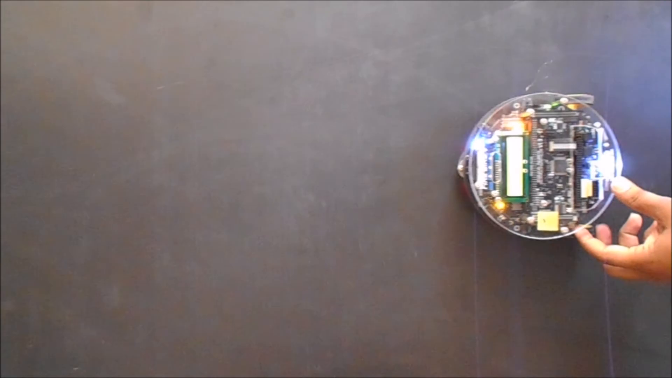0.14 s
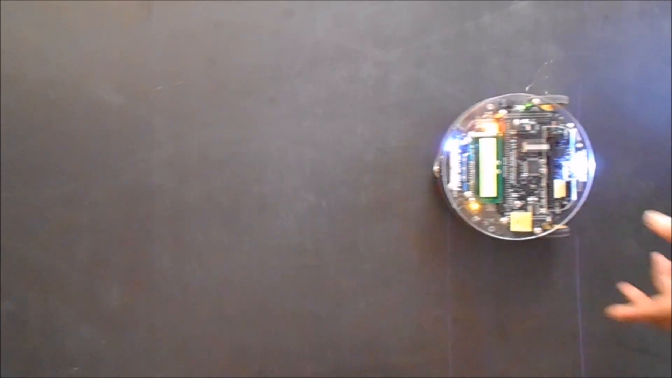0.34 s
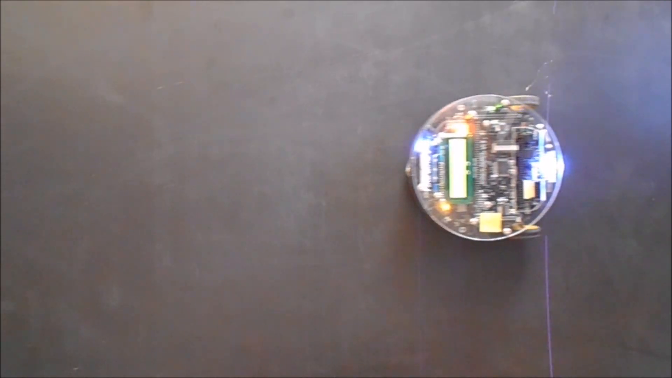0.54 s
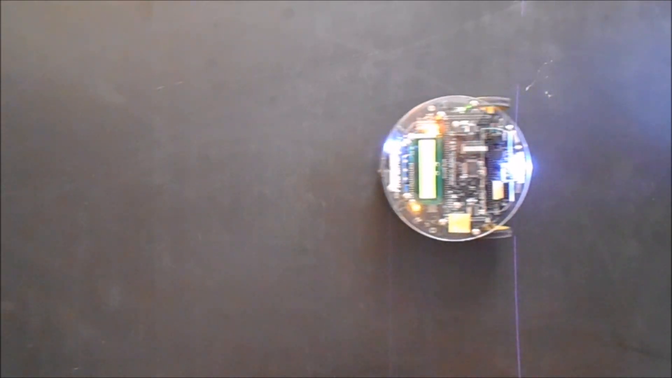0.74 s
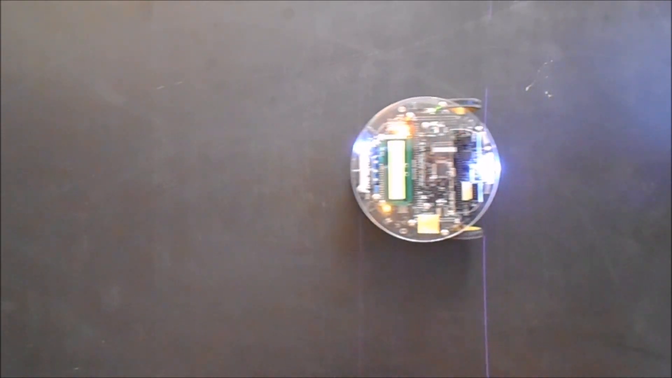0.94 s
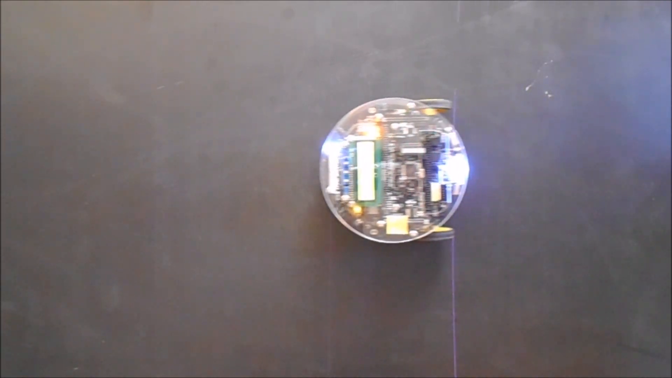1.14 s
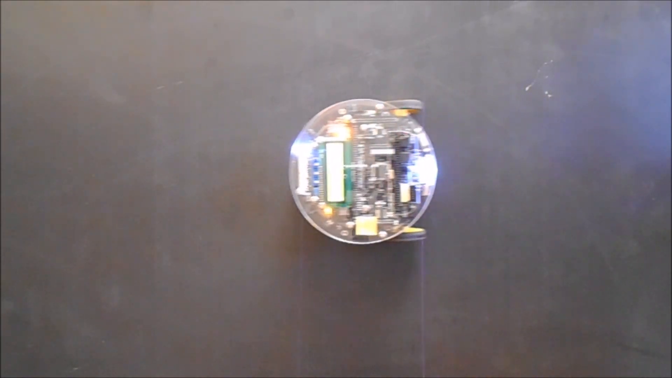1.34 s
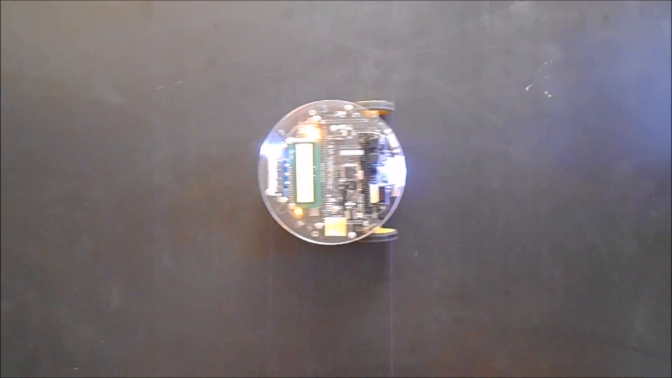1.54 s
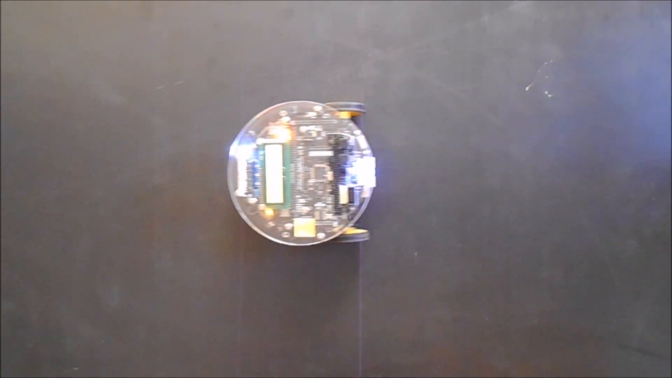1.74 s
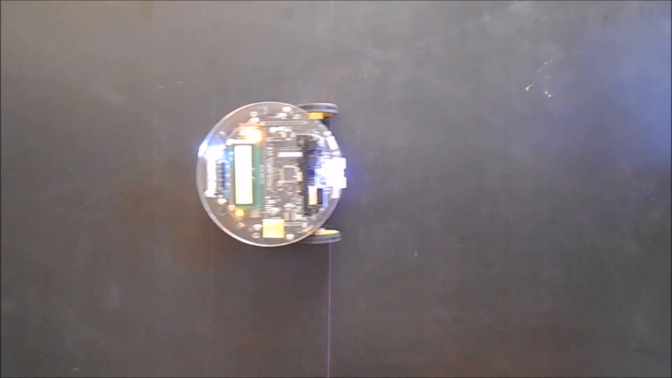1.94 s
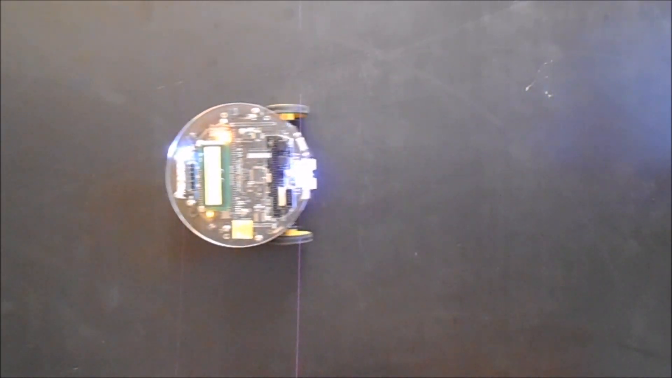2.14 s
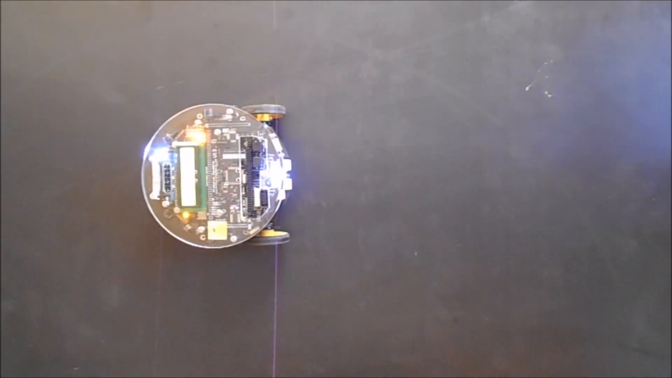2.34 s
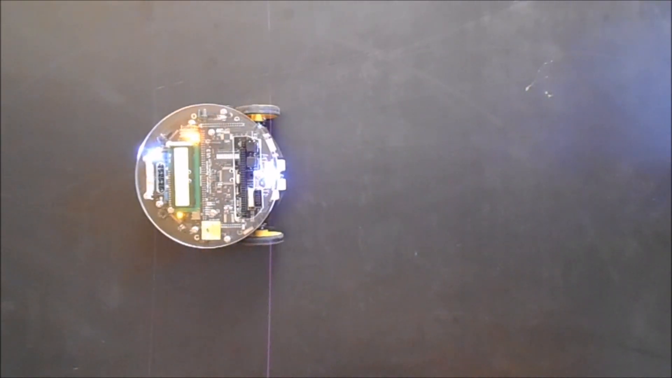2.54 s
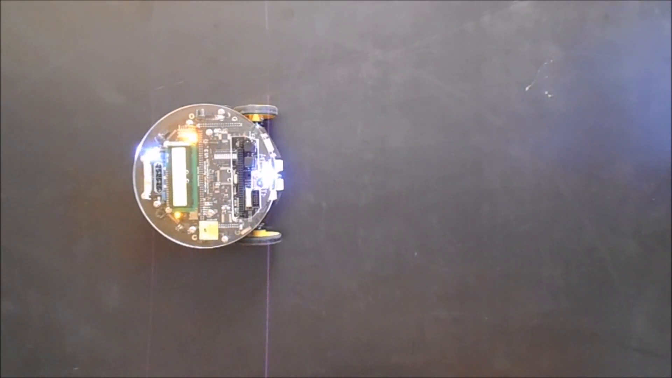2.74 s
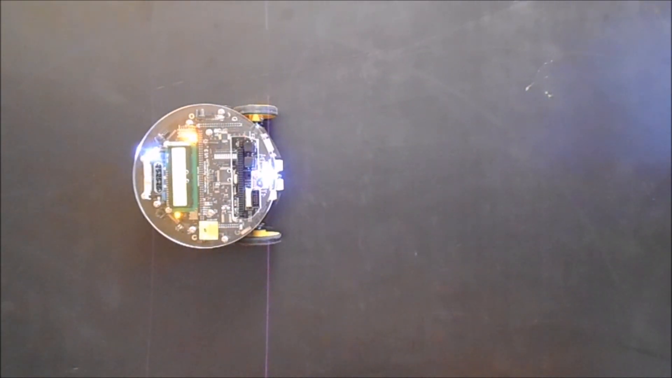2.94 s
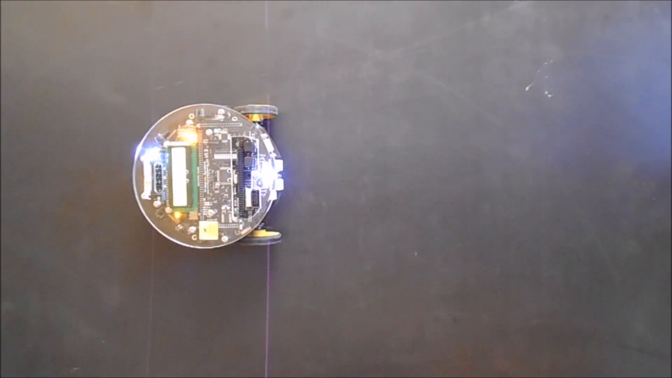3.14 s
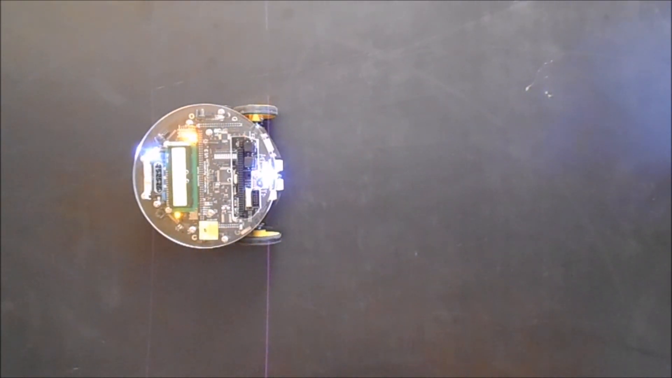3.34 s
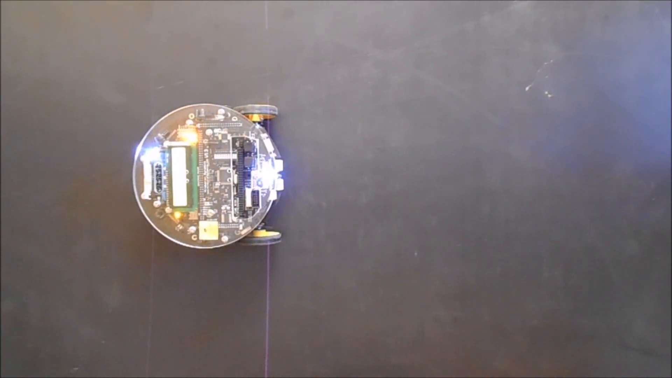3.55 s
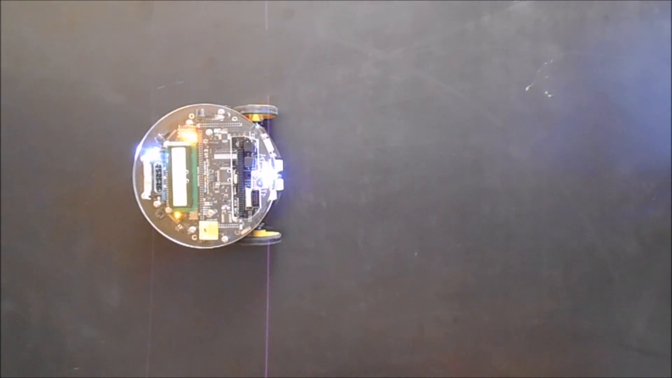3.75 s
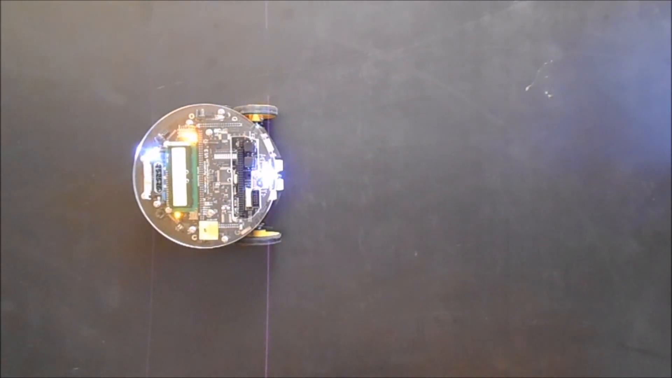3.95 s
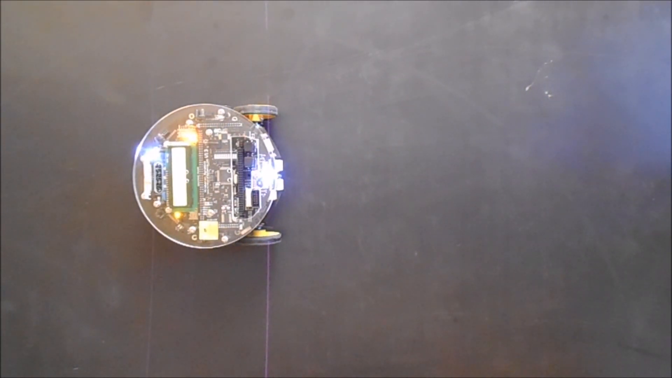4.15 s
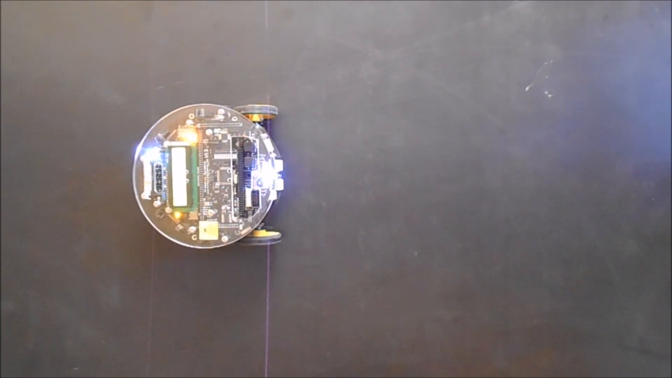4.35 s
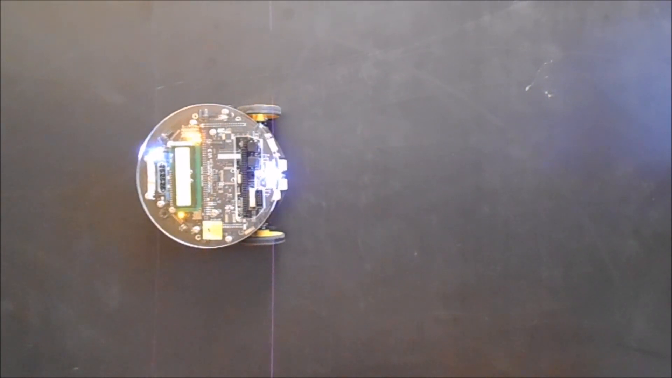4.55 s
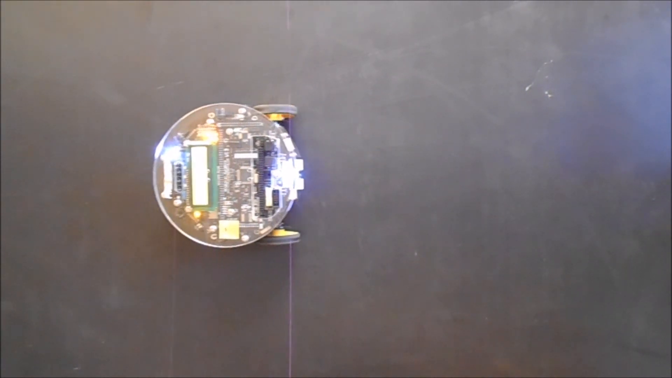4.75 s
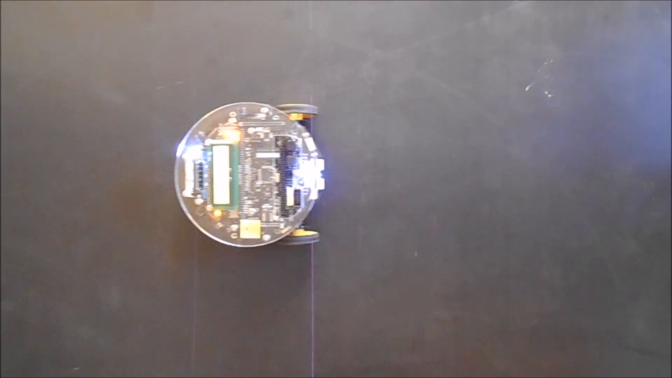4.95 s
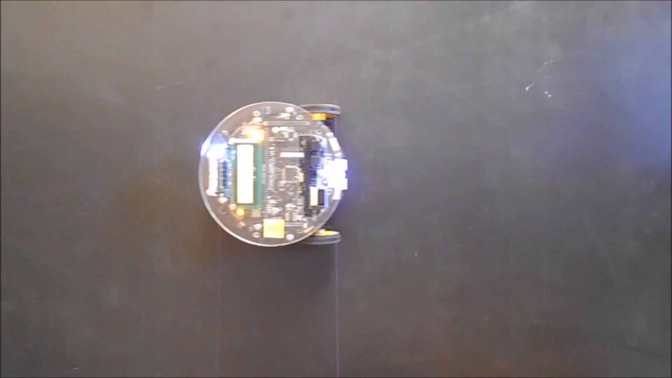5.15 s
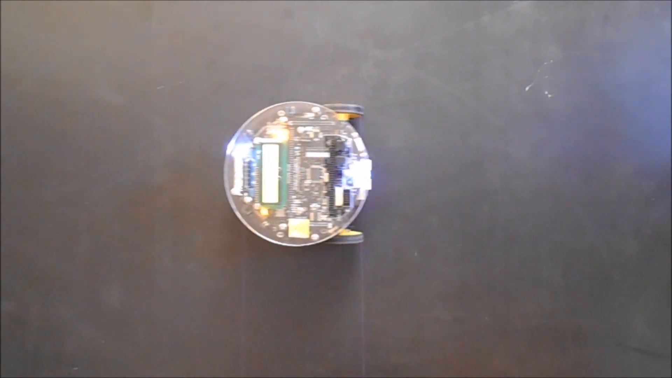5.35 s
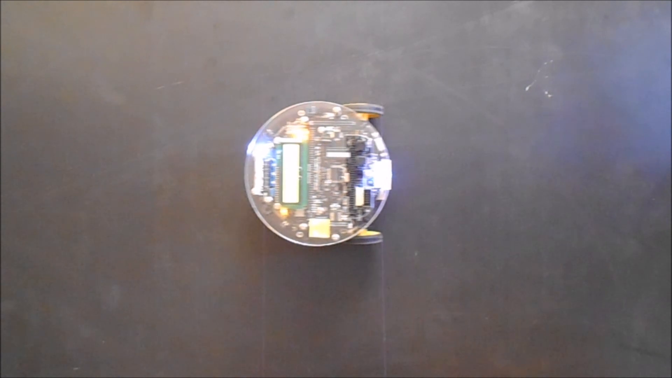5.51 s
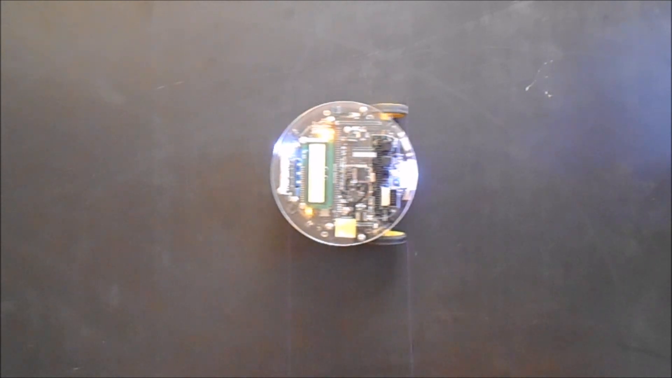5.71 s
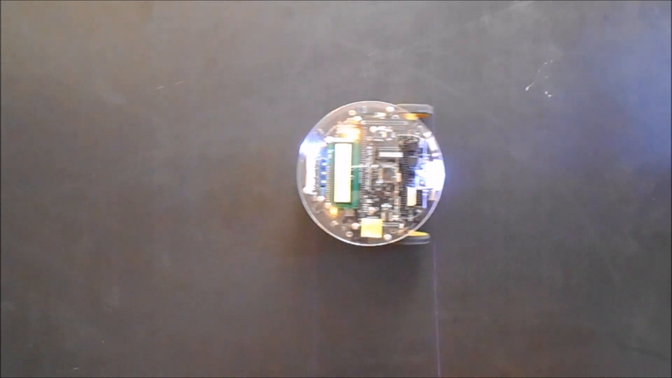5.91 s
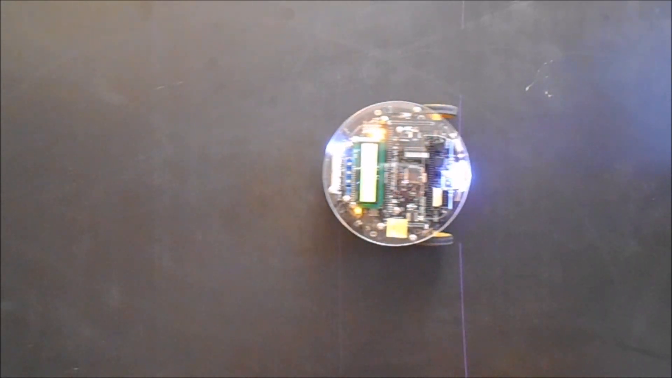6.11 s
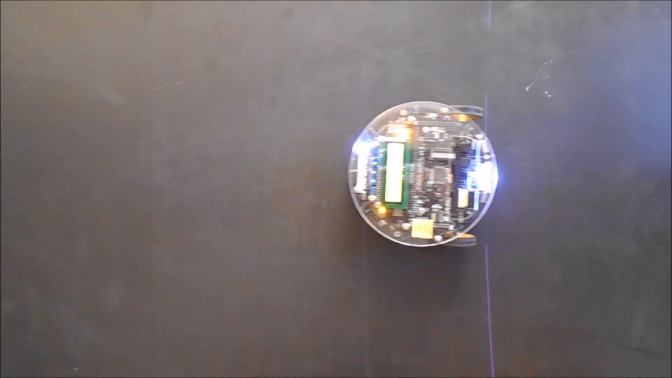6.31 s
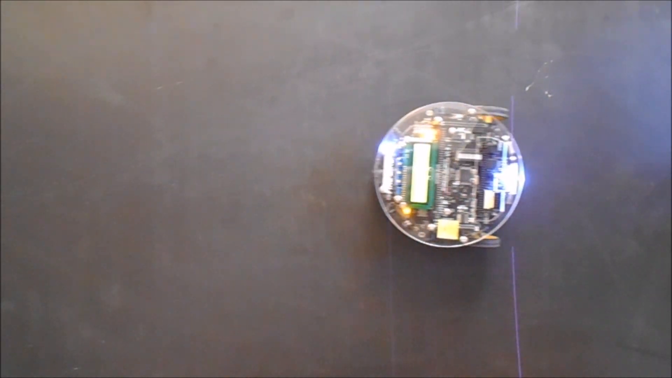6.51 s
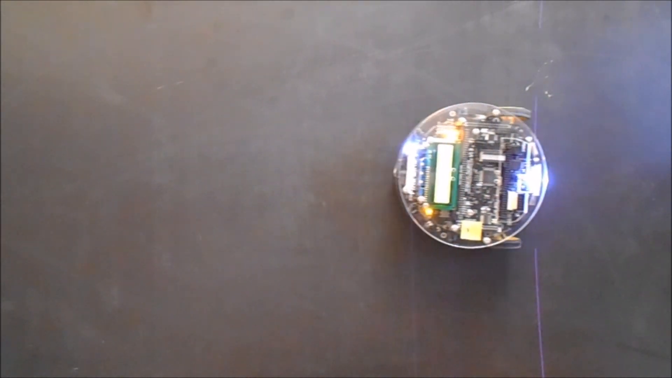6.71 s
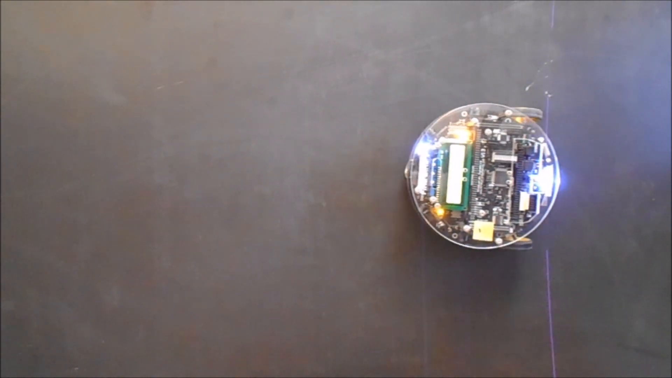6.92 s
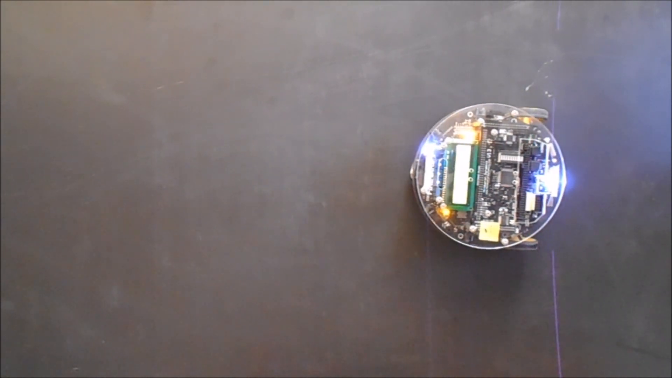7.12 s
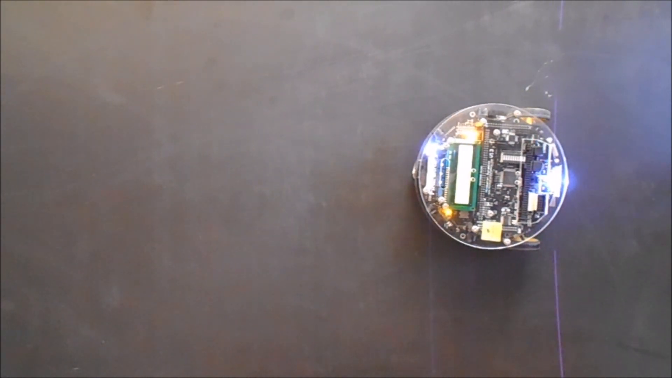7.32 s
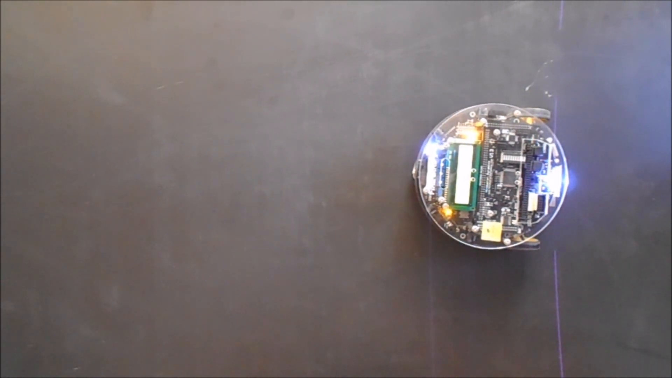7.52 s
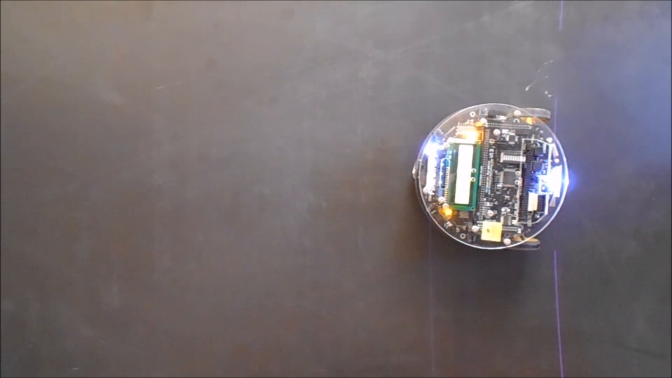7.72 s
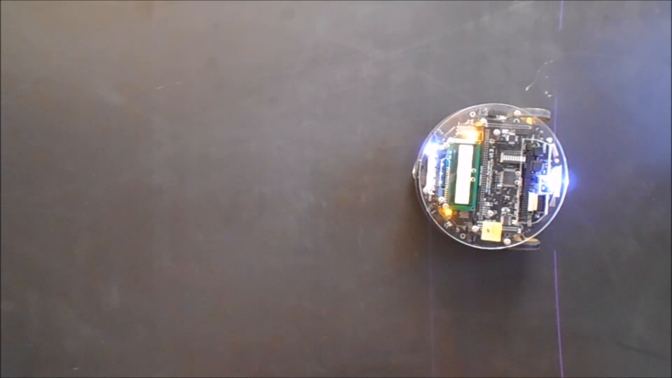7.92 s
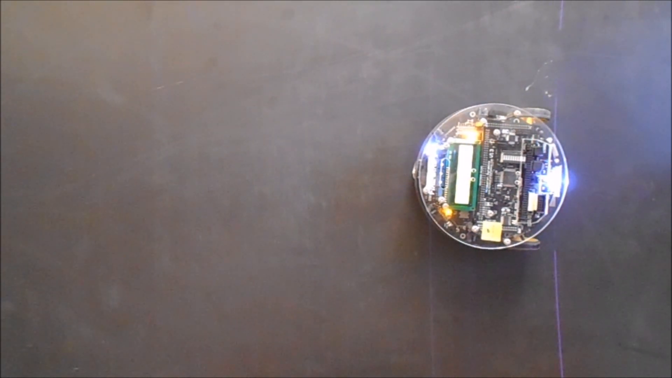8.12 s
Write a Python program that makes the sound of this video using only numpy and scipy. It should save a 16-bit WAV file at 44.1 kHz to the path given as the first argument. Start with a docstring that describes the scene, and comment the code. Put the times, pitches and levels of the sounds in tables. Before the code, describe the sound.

Small geared electric motors make two bright, rattling runs with a pause between, after a sharp switch click in a softly humming room.

```python
"""A small robot drives out and back

A switch snaps on, and a two-wheeled robot crosses a hard floor, rests, and returns more slowly.
Its gear teeth chatter and make the plastic body ring, notes come and go, and a dry bearing squeals.
The whir grows with motor speed and with nearness to a microphone above the track, and sound
bouncing off the floor colours it. Ventilation hums in the room."""
import sys
import numpy as np
from scipy import signal
from scipy.fft import rfft, irfft
from scipy.io import wavfile
from scipy.ndimage import uniform_filter1d, map_coordinates

SR = 44100
rng = np.random.default_rng(int(sys.argv[2]) if len(sys.argv) > 2 else 0)


def to_wav(s):
    """Save 16-bit WAV."""
    ch = np.atleast_2d(s).T  # columns
    pcm = np.round(np.clip(ch, -1, 1) * 32767)  # PCM
    wavfile.write(sys.argv[1], SR, pcm.astype(np.int16))


N = 364707
TIME = np.arange(N) / SR
FREQS = np.arange(4097) * SR / 8192  # the frequencies [Hz] at which filters are drawn
METRES_PER_TOOTH, TEETH_PER_TURN = .001, 195  # "teeth" counts gear teeth: up going out, down going back

# The drive out and the drive back. (start [s], speeding up [s], power off [s], speed lost in braking [0-1],
# coasting time constant [s], standstill [s], whir level [dB], body level [dB], wheel wobble [dB])
RUNS = [(0.203, 0.05, 2.338, 0.38, 0.165, 2.76, -40.5, -45.5, 0),
        (4.512, 0.2, 6.69, 0.05, 0.24, 7.27, -40.5, -48.5, 1.5)]


def gearbox(run, force, chassis_gain, teeth, loudest_past_m, split_hz=3900):
    """Chattering gears shake the plastic body: a bright whir, and a lower sound that swells under load."""
    start, whir_db, body_db, wobble_db = run[0], *run[6:]
    speed, near = motor_speed(run), nearness(teeth, loudest_past_m)
    treble = 1 / (1 + (split_hz / (FREQS + 1)) ** 12)
    whir, body = (colour(force, chassis_gain * np.sqrt(share)) for share in (treble, 1 - treble))
    whir, body = (part / np.std(part[speed > .5]) for part in (whir, body))
    turning_db = wobble_db * np.cos(2 * np.pi * teeth / TEETH_PER_TURN)
    pulling_away_db = 9 * decay(start, t60=.87)
    whir_gain = from_db(whir_db) * speed ** .94 * near
    body_gain = from_db(body_db + turning_db + pulling_away_db) * speed ** .33 * near ** .95
    return whir_gain * whir + body_gain * body


def motor_speed(run, settle_s=.1, brake_s=.025):
    """Speed from 0 to 1: the motors spin up, cruise, brake briefly, coast and stop."""
    start, spin_up, power_off, brake, coast, standstill = run[:6]
    rise = np.clip((TIME - start) / spin_up, 0, 1)
    since_off = np.maximum(TIME - power_off, 0)
    braking = 1 - brake * (1 - np.exp(-since_off / brake_s))
    stopping = np.clip((standstill - TIME) / settle_s, 0, 1)
    return rise * braking * np.exp(-since_off / coast) * stopping


def gear_chatter(teeth, tooth_hz, rattles_per_tooth=12, tap_db=-10, slide_db=-4, flutter_db=1.35):
    """The force in the gears: each tooth taps, rattles loosely and slides on its neighbour."""
    slack = .12 * drift(150) * np.abs(tooth_hz) / tooth_hz.max()  # shifts each tap a little
    taps = np.abs(np.diff(np.floor(teeth + slack), prepend=0))
    loose = rng.random(N) < rattles_per_tooth * (np.abs(tooth_hz) + 20) / SR
    rattle = loose * rng.choice([-1, 1], N)
    force = unit(rattle) + from_db(tap_db) * unit(taps) + from_db(slide_db) * rng.standard_normal(N)
    return force * from_db(flutter_db * drift(90))  # the loudness flutters quickly at random


# The notes at which the plastic body and the gearbox ring.
# (pitch [Hz], rough width [Hz], relative level forwards [dB], relative level backwards [dB])
CHASSIS_NOTES = [(1146, 314, -19, -17), (1350, 62, -11.5, -7.5), (1500, 156, -12, -10),
                 (1647, 47, -8.5, -7.5), (1936, 128, -8.5, -4.5), (2259, 85, -6.5, -6.5),
                 (2680, 130, -20, -13.5), (2994, 120, -18, -11), (3160, 400, -12, -11.5),
                 (4240, 390, -13, -12), (4790, 220, -6, -5), (5280, 220, -4.5, -8.5),
                 (5270, 120, -10.5, -12), (5630, 210, -3.5, -4), (6440, 45, -3, 1), (6380, 650, -1.5, -4),
                 (6910, 100, 1, 0), (7350, 160, 1.5, -0.5), (7910, 245, 2.5, 1), (8100, 200, -18, -26),
                 (8600, 380, 1.5, -0.5), (9270, 420, -5, -2), (9400, 220, 3, -7), (9060, 160, -2, -5),
                 (9944, 317, 5.5, -0.5)]


def chassis(backwards):
    """How strongly the plastic body answers each frequency, for one direction of travel."""
    column = 3 if backwards else 2
    power = sum((from_db(row[column]) * bell(row[0], 2 * row[1])) ** 2 for row in CHASSIS_NOTES)
    return np.sqrt(power)


# The tones of the gear whine. (multiple of the tooth rate [times], relative level [dB])
WHINE_TONES = [(5, -23.5), (6, -21), (7, -16), (8, -22), (10, -23), (12, -21.5), (26, -20.5), (30, -17.5)]


def gear_whine(teeth, speed, level_db=-41):
    """Teeth meeting at a regular rate make clean tones, loudest just past the microphone."""
    phase = 2 * np.pi * teeth + .1 * drift(12)
    tones = sum(from_db(db + 2.2 * drift(10.93)) * np.sin(round(k) * phase) for k, db in WHINE_TONES)
    near = nearness(teeth, loudest_past_m=.083)
    return np.sqrt(2) * tones * from_db(level_db) * near ** 3.6 * speed ** 2


# Ringing notes, each heard best around one place on the track. (pitch [Hz], width [Hz], place [m],
# reach [m], pitch bend [Hz per m], level forwards [dB], level backwards [dB])
PASSING_NOTES = [(938, 50, 0.294, 0.039, -1, -71, -62), (1552, 110, 0.365, 0.046, -400, -57, -53.5),
                 (2264, 190, 0.067, 0.085, -300, -72, -57), (2500, 390, 0.018, 0.15, -1.5, -53, -59),
                 (3026, 170, 0.33, 0.099, 301, -85, -56.5), (4940, 120, 0.29, 0.048, -600, -60, -53),
                 (5380, 110, 0.37, 0.04, -900, -53, -51.5), (5630, 100, 0.34, 0.067, 700, -59.5, -52),
                 (6370, 110, 0.23, 0.034, -900, -51, -46.5), (6950, 140, 0.22, 0.024, -2000, -50, -47),
                 (7700, 200, 0.16, 0.047, -1000, -52, -50), (8520, 170, 0.188, 0.033, -5.5, -60, -46.5),
                 (9340, 170, 0.3, 0.092, -2000, -47.5, -49.5), (9750, 360, 0.28, 0.087, -0.5, -42, -44.5)]


def passing_notes(teeth, speed_out, speed_back):
    """Ringing notes bend, swell and fade, each loudest at one place along the track."""
    sound = np.zeros(N)
    for hz, width, place, reach, hz_per_m, out_db, back_db in PASSING_NOTES:
        past_m = teeth * METRES_PER_TOOTH - place
        pitch = hz * (1 + .005 * drift(30)) + hz_per_m * past_m
        note = ringing(pitch, width, pure=250 / width)  # narrow notes sing more clearly
        flutter = from_db(3 * drift(120) + 1.2 * drift(18))
        drive = from_db(out_db) * speed_out ** .49 + from_db(back_db) * speed_back ** .49
        sound += unit(note * flutter) * drive * np.exp(-.5 * (past_m / reach) ** 2)
    return sound


def coasting_ring(speed, level_db=-57.5):
    """A thin ring of the gearbox holds on while the drive back coasts to a stop."""
    power_off = RUNS[1][2]
    fade_in = np.clip((TIME - power_off) / .2 + 1, 0, 1)
    return from_db(level_db) * ringing(hz=4750, width=170, pure=1) * speed ** .89 * fade_in


# The squeal early in the drive out. (time [s], pitch [Hz], level before swells [dB])
SQUEAL_PATH = [(0.17, 2340, -90), (0.195, 2351, -51), (0.3, 2313, -48), (0.39, 2350, -52.5),
               (0.6, 2300, -55), (0.72, 2263, -53.5), (0.97, 2250, -50.5), (1.13, 2260, -59),
               (1.34, 2262, -55), (1.7, 2235, -90)]
# Moments when the bearing catches. (time [s], length [s], swell [dB])
BEARING_CATCHES = [(0.754, 0.018, 15), (0.801, 0.023, 8), (1.201, 0.022, 15), (1.284, 0.03, 13.5)]


def dry_bearing(rattle_db=3):
    """A dry bearing sings one finely rattling note that sags a little and swells where it catches."""
    swell_db = sum(db * np.sin(np.pi * np.clip((TIME - start) / length, 0, 1))
                   for start, length, db in BEARING_CATCHES)
    note = ringing(curve(SQUEAL_PATH), width=240, pure=2.2)
    rattle = from_db(rattle_db * drift(190))
    return unit(note * rattle) * from_db(curve(SQUEAL_PATH, column=2) + swell_db)


def wheel_grip(level_db=-44):
    """The wheels grip the floor with a short rasp."""
    return from_db(level_db) * noise_band(hz=1700, width=1500) * decay(start=.223, t60=.11)


# The notes at which the circuit board rings. (pitch [Hz], rough width [Hz], relative level [dB])
BOARD_NOTES = [(2440, 140, -9.5), (3140, 150, -8.5), (4220, 450, -4.5), (6650, 410, -9), (7060, 620, -3.5),
               (8140, 500, -12), (9500, 1300, -12.5)]


def power_switch(start=.0941, snap_db=-18, buzz_db=-47, rattle_db=-45.5):
    """The slide switch scrapes over and snaps home; the circuit board buzzes and rattles briefly."""
    push = .4 * rng.standard_normal(N) * decay(start, t60=.02)
    push[int(start * SR) + SR // 1000] += 1  # the snap, 1 ms into the scrape
    board = np.sqrt(sum((from_db(db) * bell(hz, 2 * width)) ** 2 for hz, width, db in BOARD_NOTES))
    snap = colour(push, board)
    snap *= from_db(snap_db) / np.abs(snap).max()
    grains = rng.standard_normal(N) * from_db(3 * drift(400))
    buzz = unit(colour(grains, bell(hz=4330, width=1800) ** 2)) * decay(start, t60=.53)
    rattle = unit(colour(rng.standard_normal(N), bell(hz=7100, width=8000))) * decay(start, t60=.89)
    return room(snap, echo_db=-17, t60=.25) + from_db(buzz_db) * buzz + from_db(rattle_db) * rattle


def electric_pop(time_s=.2002, offset_db=-44):
    """A small, steady electrical offset ends suddenly and makes a soft, dull pop."""
    held = (TIME < time_s) * np.clip(TIME / .005, 0, 1)
    return colour(-from_db(offset_db) * held, np.sqrt(bell(hz=0, width=1030)))


# Knocks in the gears on braking and on setting off again. (time [s], relative level [dB])
GEAR_KNOCKS = [(2.4197, -24.5), (2.436, -30), (2.456, -35), (4.521, -35), (4.5365, -31), (4.5429, -26)]


def gear_knocks():
    """The slack between the teeth closes with bright ticks."""
    blows = sum(from_db(db) * decay(start, t60=.018) for start, db in GEAR_KNOCKS)
    return room(.5 * blows * noise_band(hz=8800, width=7500), echo_db=-11, t60=.09)


def nearness(teeth, loudest_past_m, mic_along_m=.27, mic_height_m=.29):
    """Nearer is louder: the gain reaches 1 at loudest_past_m along the track from the microphone."""
    along_m = teeth * METRES_PER_TOOTH - mic_along_m - loudest_past_m
    return mic_height_m / np.hypot(mic_height_m, along_m)


def floor_bounce(sound, teeth, lag_ms=.098, ms_per_tooth=.00022, strength=.2):
    """The floor's echo comes later as the robot drives out, sweeping a broad peak through the whir."""
    lag_samples = (lag_ms + ms_per_tooth * teeth) * SR / 1000
    return sound + strength * map_coordinates(sound, [np.arange(N) - lag_samples], order=3)


# Short dips in the whole sound. (start [s], end [s], nominal depth [dB], mainly below [Hz])
LEVEL_DIPS = [(5.708, 5.730, -18, 5000), (5.858, 5.900, -22, 5000), (7.277, 7.309, -36, 16000)]


def level_dips(sound, hiss_db=-55):
    """Taking away a duller copy makes the sound dip briefly; after the last dip a little hiss fades."""
    for start, end, depth_db, below_hz in LEVEL_DIPS:
        dull = signal.sosfiltfilt(signal.butter(6, below_hz, fs=SR, output="sos"), sound)
        window = uniform_filter1d(1. * ((TIME > start) & (TIME < end)), size=90)
        sound = sound - (1 - from_db(depth_db)) * window * dull
    hiss = noise_band(hz=2150, width=1300) * decay(start=LEVEL_DIPS[-1][1], t60=1)
    return sound + from_db(hiss_db) * hiss


# The tone of the rushing air. (frequency [Hz], relative level [dB])
AIR_TONE = [(25, -9.5), (50, -10.5), (90, -15), (200, -14), (400, -12.5), (650, -1.5), (1000, -1.5),
            (1900, -3), (2600, -5.5), (3600, -12.5), (4500, -12), (6500, -16), (9800, -16), (10600, -28)]
# Pitches that the air duct lifts or weakens. (pitch [Hz], width [Hz], lift [dB])
DUCT_NOTES = [(145, 22, 4.5), (234, 21, 3.5), (302, 210, 6), (501.6, 11, 9.5), (743, 20, 4.5),
              (845.5, 19, 7.5), (936, 35, 9), (1123, 58, 3), (1314, 133, -8.5), (1412, 140, 9),
              (1620, 90, 3.5), (1673, 22, 6.5), (1890, 42, 8.5), (3610, 210, 7.5)]
# How loud the air is. (time [s], level [dB])
AIR_LOUDNESS = [(0, -57), (0.17, -58), (0.26, -55.5), (8.27, -55)]


def ventilation():
    """Air rushes through a ringing duct."""
    air_hz, air_db = np.transpose(AIR_TONE)
    shape_db = np.interp(np.log(FREQS + 1), np.log(air_hz), air_db)
    shape_db += sum(lift * bell(hz, width) for hz, width, lift in DUCT_NOTES)
    level_db = curve(AIR_LOUDNESS) + .35 * drift(35)
    return unit(colour(rng.standard_normal(N), from_db(shape_db))) * from_db(level_db)


# Faint tones in the background. (pitch [Hz], typical level [dB])
FAINT_TONES = [(156, -87), (312, -81), (748, -79), (861, -79), (940, -84), (1599, -74.5), (3435, -78.5)]


def faint_tones():
    """Faint wavering tones and a thin whistle sit in the background."""
    tones = sum(from_db(db + 4.3 * drift(9)) * np.sin(2 * np.pi * hz * TIME + 1.3 * drift(9))
                for hz, db in FAINT_TONES)
    return np.sqrt(2) * tones


def room(sound, echo_db, t60):
    """Add the room's many echoes, blurred into one fading tail."""
    age = TIME[:SR // 2]
    tail = rng.standard_normal(len(age)) * np.exp(-np.log(1000) * age / t60) * (age > .003)
    return sound + from_db(echo_db) * signal.oaconvolve(sound, tail / np.linalg.norm(tail))[:N]


def ringing(hz, width, pure):
    """A note shaken at random; the higher pure is, the more it sings as a clean tone."""
    rate = 1.8 * width
    phase = 2 * np.pi * np.cumsum(hz + np.zeros(N)) / SR
    return unit((drift(rate) + pure) * np.cos(phase) + drift(rate) * np.sin(phase))


def noise_band(hz, width):
    """A hiss centred on one pitch."""
    return unit(colour(rng.standard_normal(N), bell(hz, width) ** 2))


def colour(sound, gain):
    """Filter a sound with one gain for each of FREQS, so that it rings after a tap, never before."""
    cepstrum = irfft(np.log(gain + 1e-6))[:len(FREQS) - 1]
    cepstrum[1:] *= 2
    tap_response = irfft(np.exp(rfft(cepstrum, 2 * len(cepstrum))))
    return signal.oaconvolve(sound, tap_response)[:N]


def bell(hz, width):
    """A bell-shaped peak over frequency: the power of one ringing note."""
    return 1 / (1 + (2 * (FREQS - hz) / width) ** 2)


def decay(start, t60):
    """Jump to 1 at start, then fade by 60 dB every t60 seconds."""
    age = TIME - start
    return (age >= 0) * np.exp(-np.log(1000) * np.clip(age / t60, 0, 10))


def drift(rate):
    """A random wander of size about 1 that turns rate times a second."""
    return unit(np.interp(TIME * rate, np.arange(16384), rng.standard_normal(16384)))


def curve(rows, column=1):
    """Join one column of a table with straight lines in time."""
    rows = np.array(rows)
    return np.interp(TIME, rows[:, 0], rows[:, column])


def unit(sound):
    """Scale to an average strength (rms) of 1."""
    return sound / np.sqrt(np.mean(sound ** 2))


def from_db(db):
    """Turn decibels into a gain."""
    return 10 ** (np.asarray(db) / 20)


def scene():
    """The robot's two drives, its small clicks and the background, the same in both channels."""
    speed_out, speed_back = (motor_speed(run) for run in RUNS)
    tooth_hz = 188.3 * speed_out - 154 * speed_back  # teeth per second, negative going back
    teeth = np.cumsum(tooth_hz) / SR
    force = room(gear_chatter(teeth, tooth_hz), echo_db=-8.5, t60=.3)
    drive_out = gearbox(RUNS[0], force, chassis(backwards=False), teeth, loudest_past_m=.063)
    drive_back = gearbox(RUNS[1], force, chassis(backwards=True), teeth, loudest_past_m=-.083)
    robot = floor_bounce(drive_out + drive_back, teeth) + gear_whine(teeth, speed_out)
    robot += passing_notes(teeth, speed_out, speed_back) + coasting_ring(speed_back)
    robot += dry_bearing() + wheel_grip() + power_switch() + electric_pop() + gear_knocks()
    mono = level_dips(robot + ventilation() + faint_tones())
    return np.array([mono, mono])


def record(dry, top_hz=10750):
    """A steep filter cuts off the highest treble."""
    return signal.sosfilt(signal.ellip(10, .2, 60, top_hz, fs=SR, output="sos"), dry)


dry = scene()
out = record(dry)
to_wav(out)
```